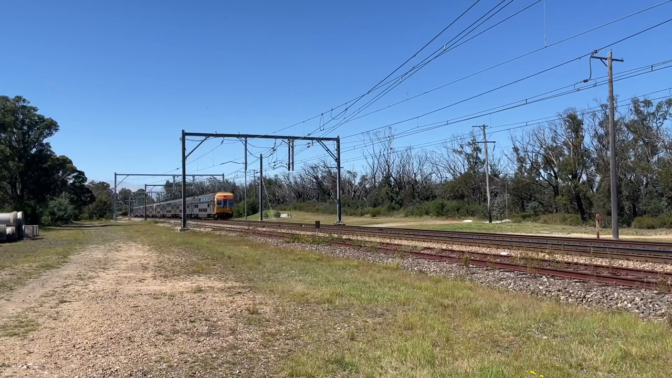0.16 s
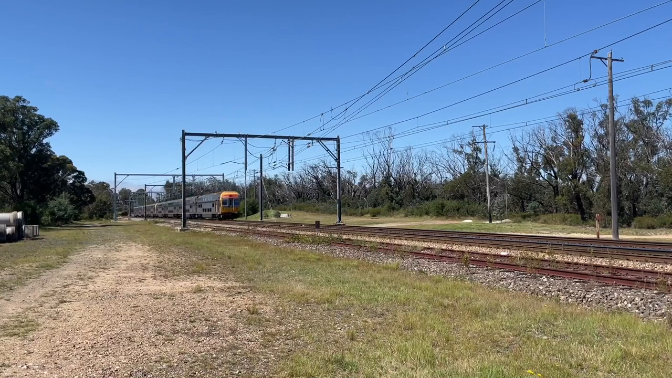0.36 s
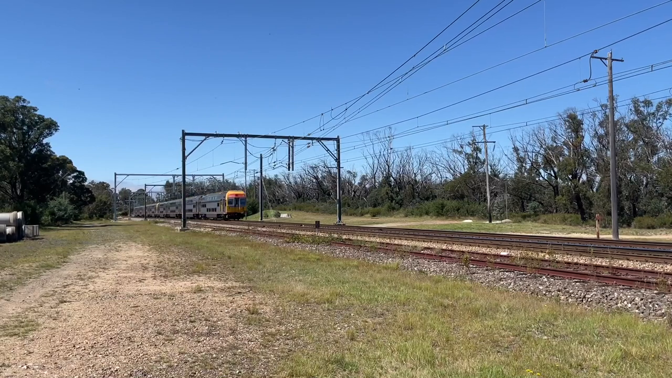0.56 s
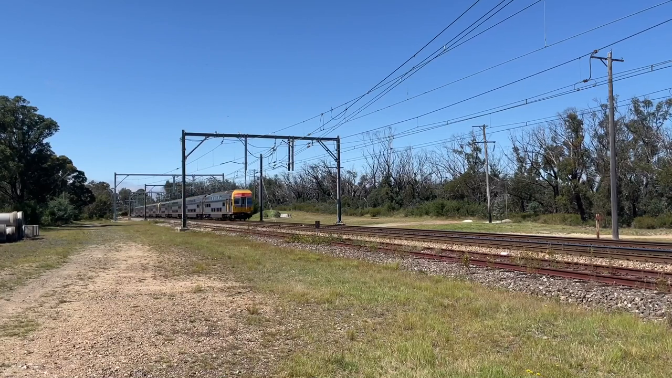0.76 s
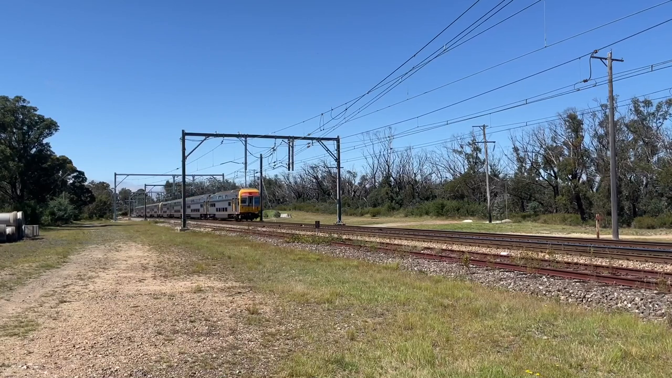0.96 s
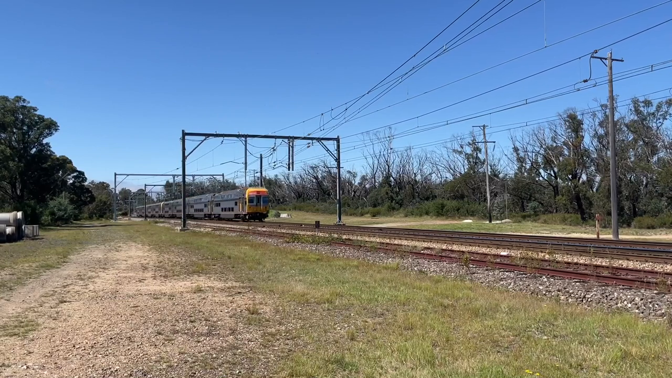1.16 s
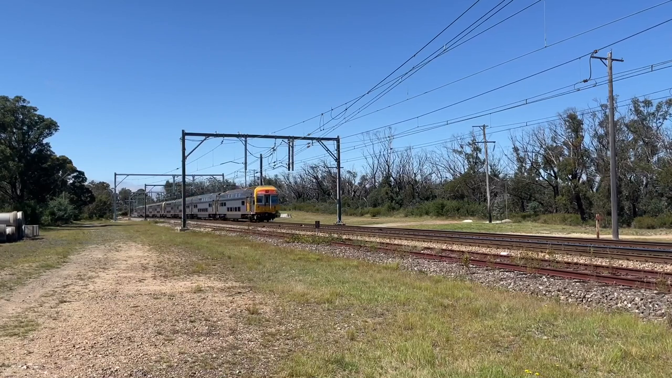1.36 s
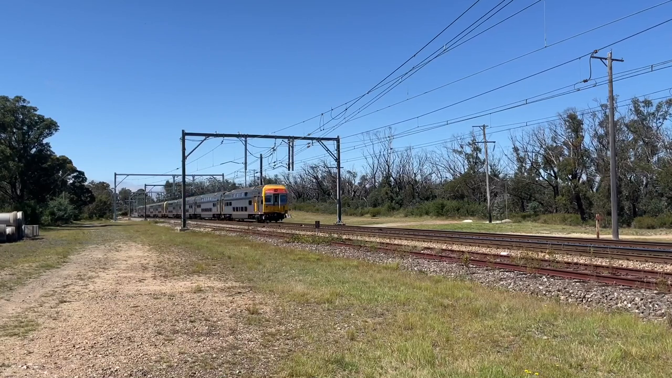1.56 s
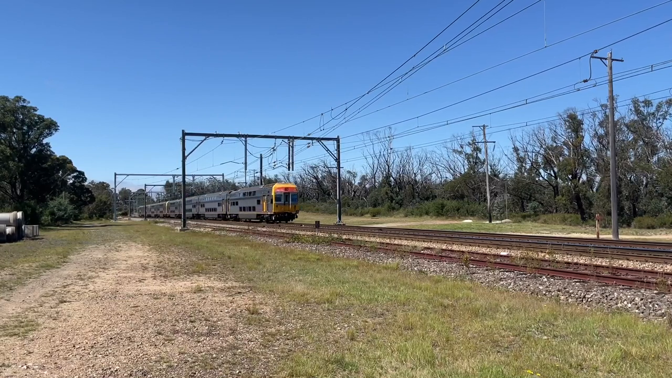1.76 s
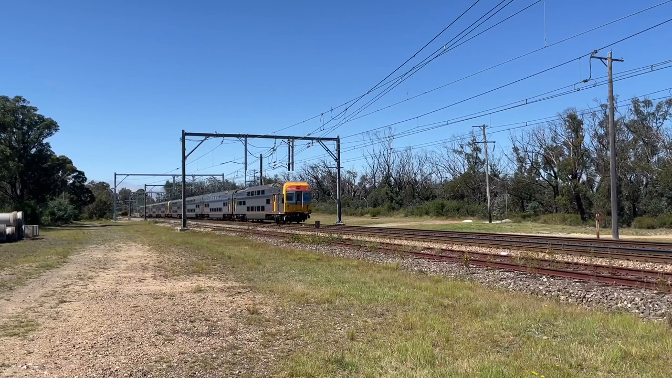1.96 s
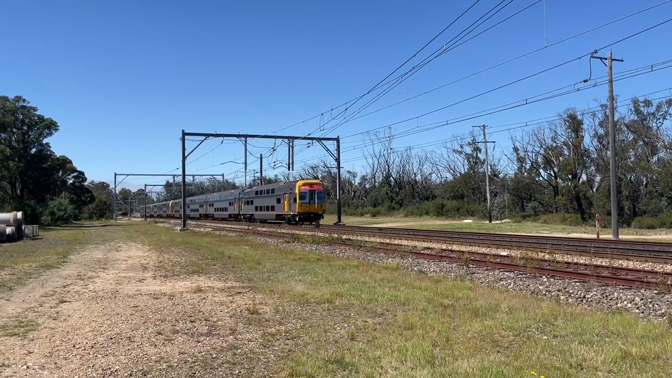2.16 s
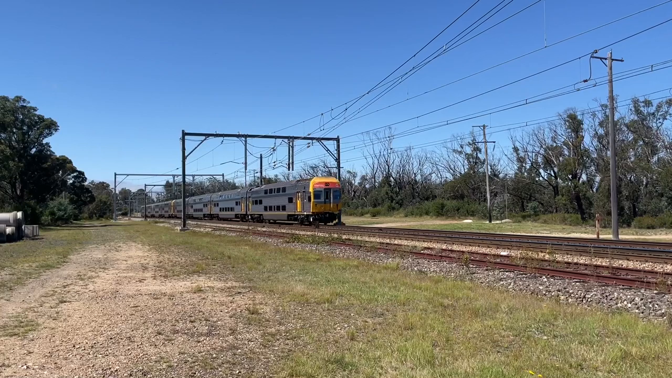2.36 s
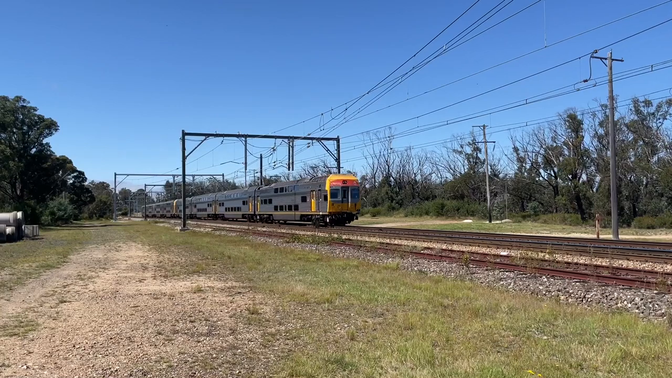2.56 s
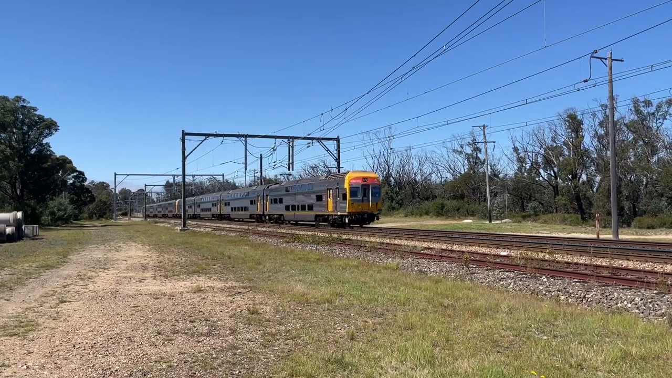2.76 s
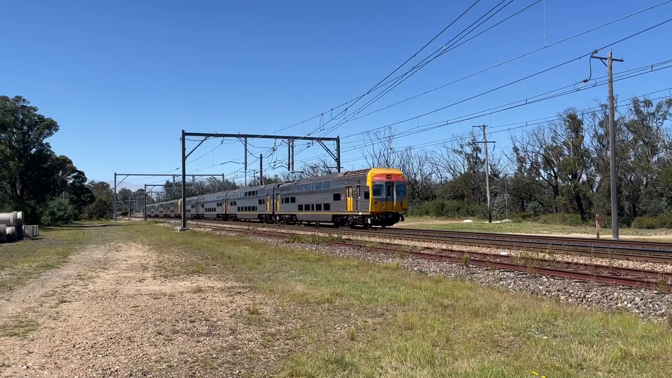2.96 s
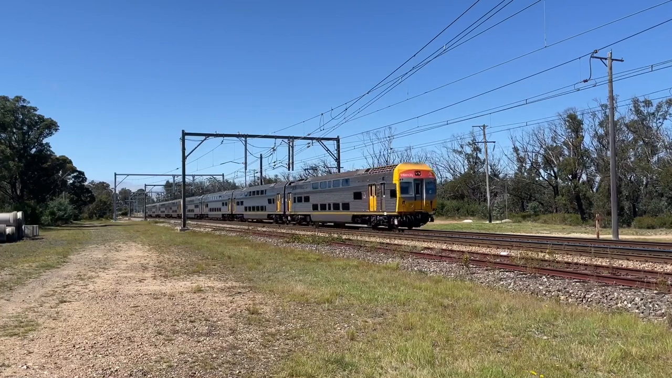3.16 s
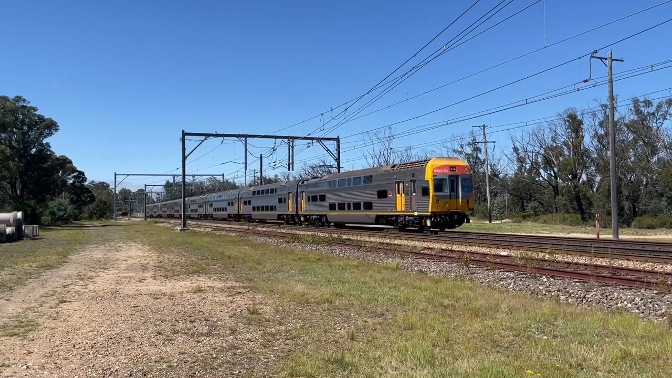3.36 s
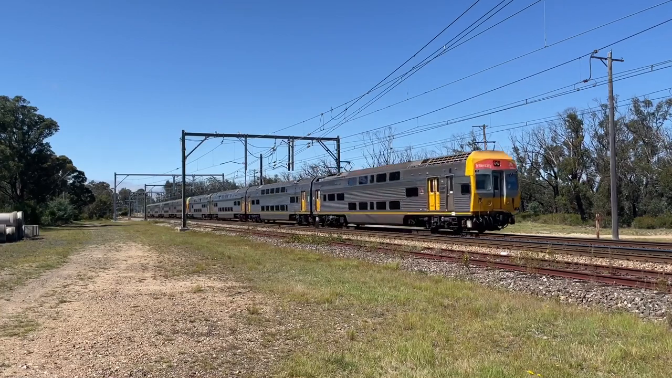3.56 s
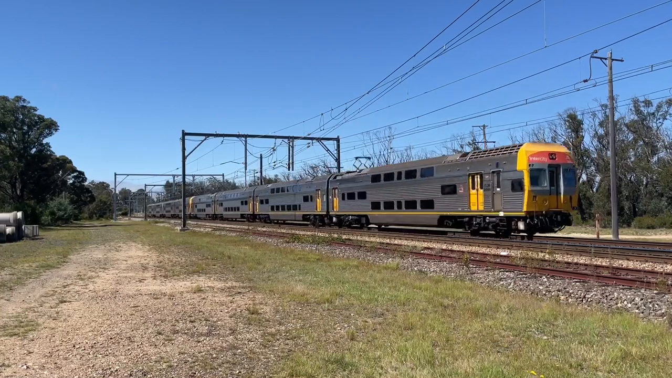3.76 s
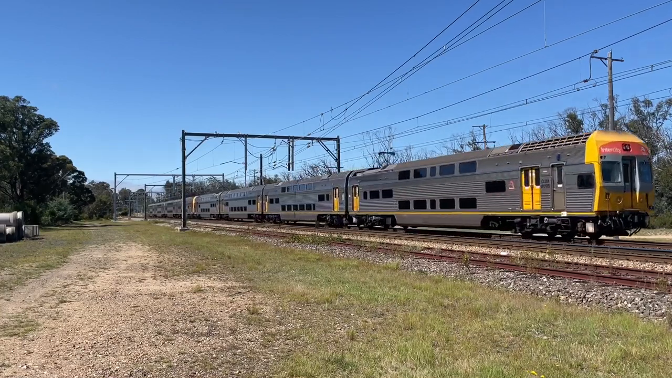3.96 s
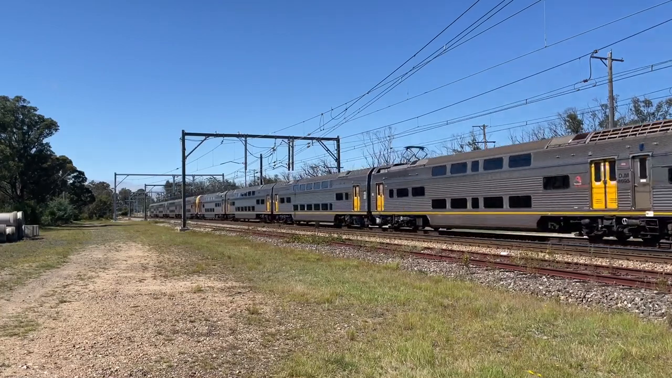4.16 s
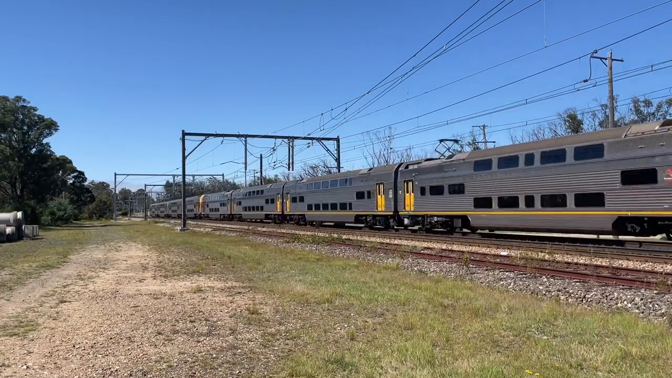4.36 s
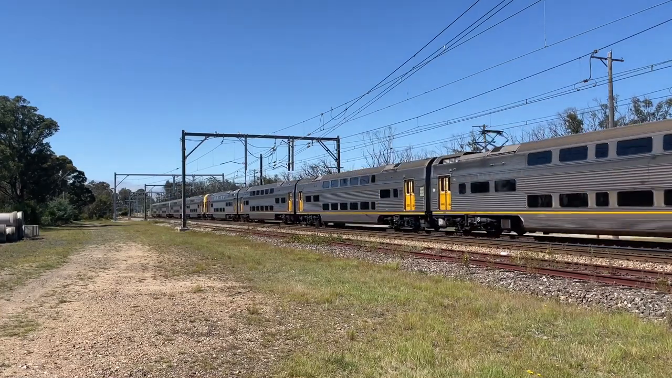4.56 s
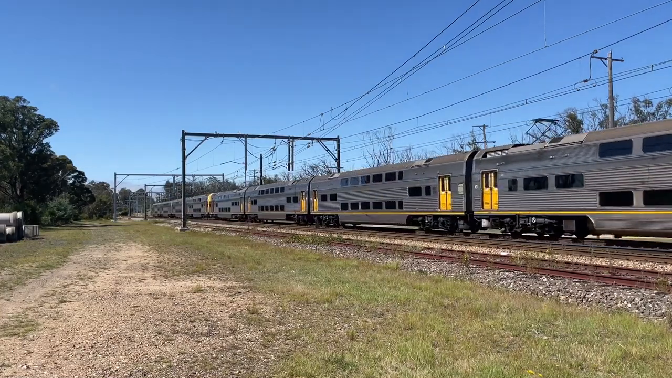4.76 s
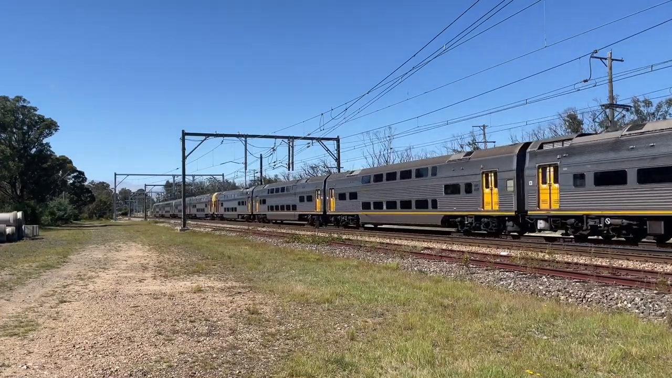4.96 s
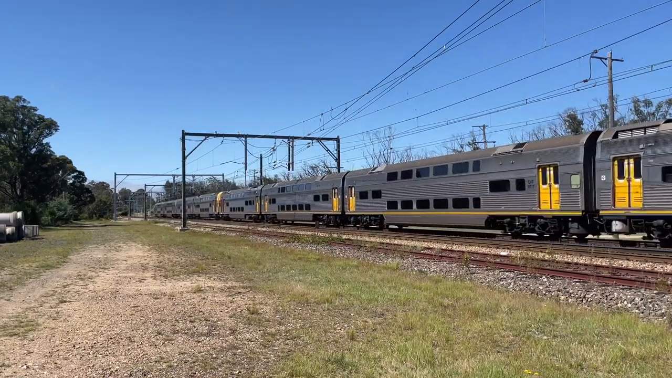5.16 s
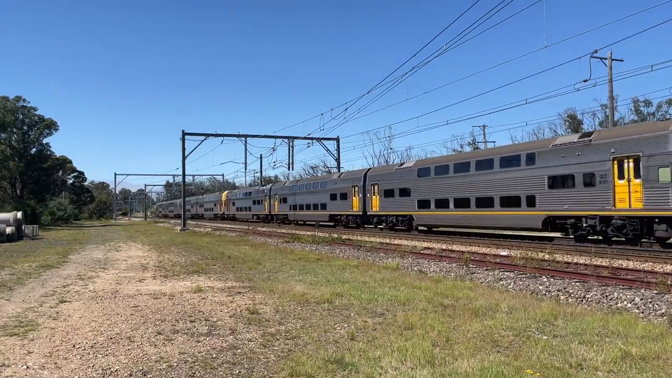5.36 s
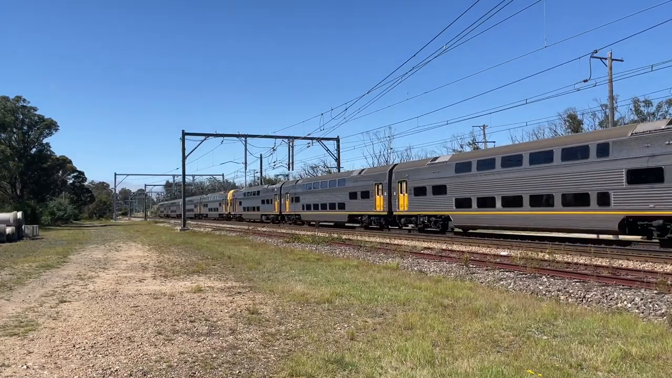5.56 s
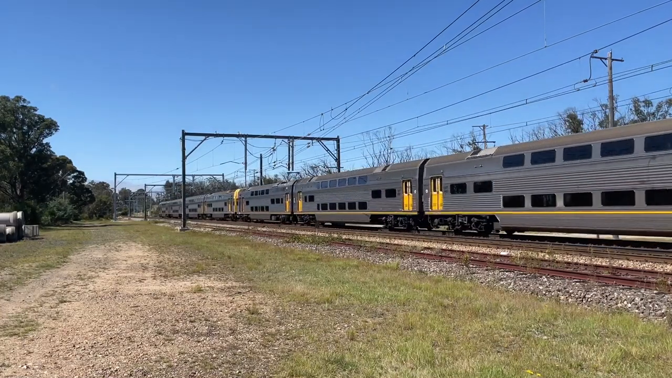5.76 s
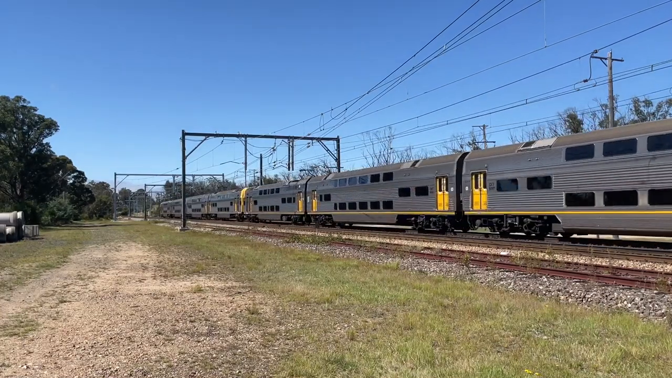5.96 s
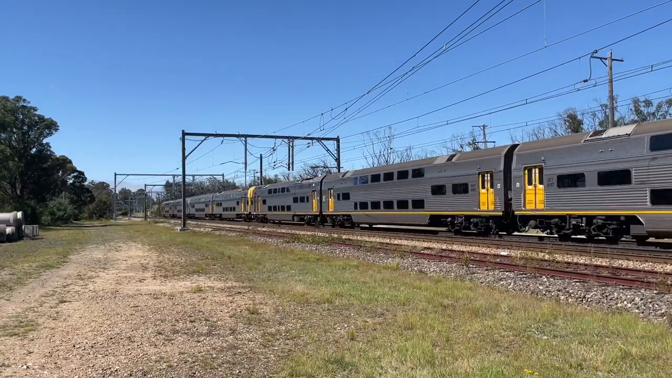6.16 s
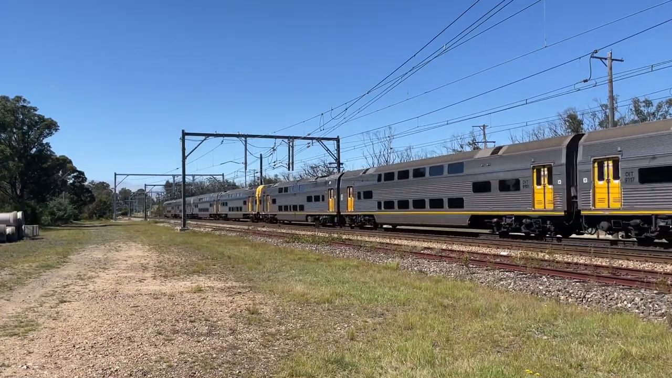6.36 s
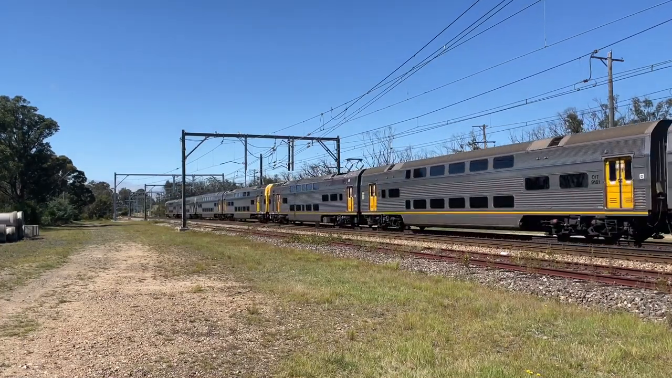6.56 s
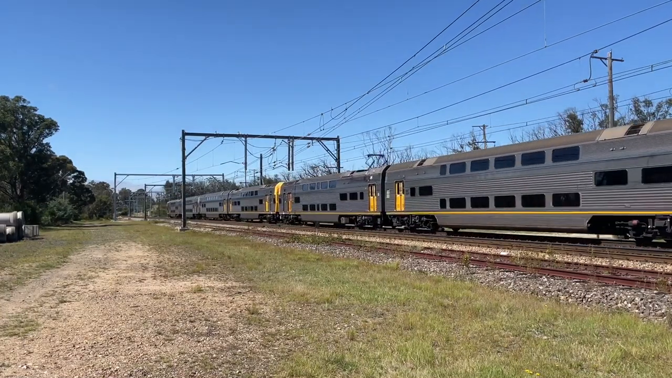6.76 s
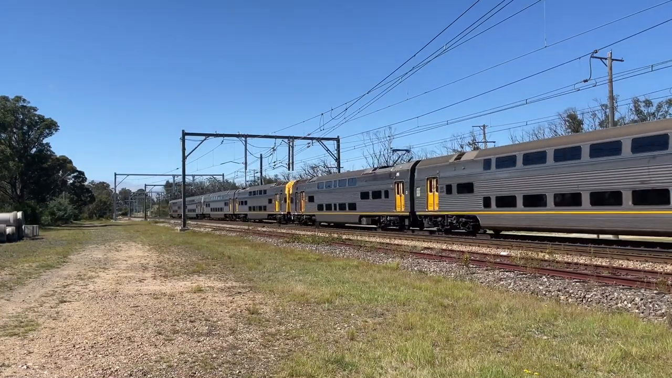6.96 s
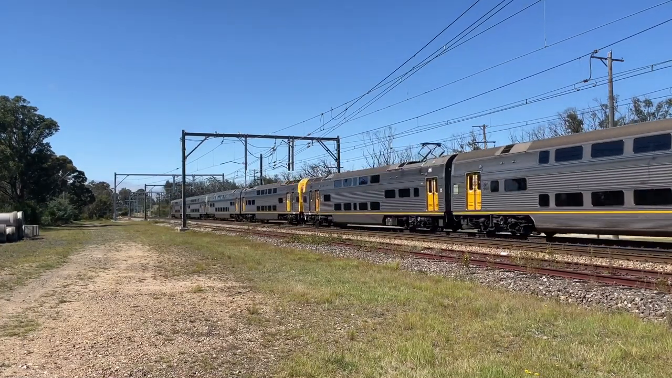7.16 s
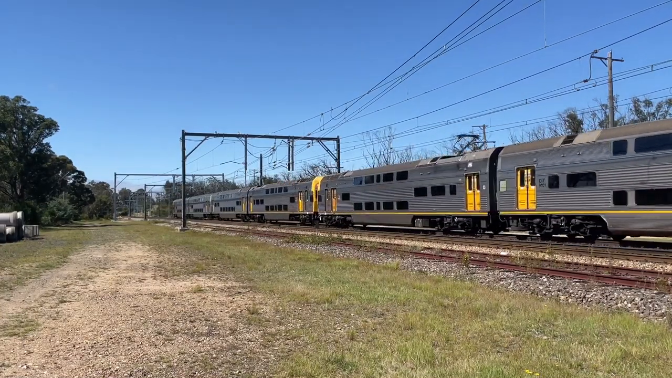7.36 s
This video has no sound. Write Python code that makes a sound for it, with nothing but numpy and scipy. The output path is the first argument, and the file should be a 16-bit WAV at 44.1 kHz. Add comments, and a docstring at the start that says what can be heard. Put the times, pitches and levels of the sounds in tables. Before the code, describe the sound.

An electric double-deck train swells from a faint distant roar to a close rumbling, ringing, whining pass, with early bird snaps and wind buffeting the microphone.

```python
"""Grass beside a country line: an electric double-deck train comes up and rolls past, 19 m from a phone.
Each group of wheels rings and hums, filtered noise read back with its own Doppler fall, over roaring rails.
Meshing gears whine as beating tones, slipping wheels sing, and worn wheels knock as bursts of noise.
Wind buffets the microphone with low noise and short tones; in the first two seconds and a bit,
a small bird snaps, whistles and trills from the bushes."""
import sys
import numpy as np
from scipy import signal
from scipy.fft import rfft, irfft, next_fast_len
from scipy.io import wavfile
from scipy.ndimage import uniform_filter1d, map_coordinates

SR = 44100
rng = np.random.default_rng(int(sys.argv[2]) if len(sys.argv) > 2 else 0)


def int16_out(signal):
    """Quantize to a 16-bit WAV file."""
    q = np.round(np.clip(np.atleast_2d(signal).T, -1, 1) * 32767)
    wavfile.write(sys.argv[1], SR, q.astype(np.int16))


N = 325899
T = np.arange(N) / SR
# room for a tail of half a second after the scene
LONG = next_fast_len(N + SR // 2, True)
HZ = np.maximum(np.arange(LONG // 2 + 1) * SR / LONG, 1)

SPEED_M_PER_S, TRACK_M, SOUND_M_PER_S = 17, 19, 343

# wheel groups: abreast t/s, relative ring level/dB, relative hum level/dB, pitch ratio
BOGIES = [(5.5, 0.5, -2.5, 1.0), (6.6, 2.5, -3, .994), (7.85, 3, 1, .985), (9.1, -1, 2.5, 1.003),
          (10.35, -4, -5, .99), (11.6, -14, 1, 1.008)]
# worn wheels knocking on the rail: t/s, level/dB, body f/Hz, decay/s
KNOCKS = [(2.247, -37, 1400, 0.009), (2.386, -39, 1050, 0.0091), (2.525, -44, 1050, 0.011),
          (2.659, -37, 1400, 0.017), (2.795, -32, 1350, 0.014), (2.801, -38.5, 2000, .012),
          (2.933, -33, 1350, 0.01), (3.073, -32, 1100, .008), (3.222, -39, 1300, .009),
          (5.727, -29, 1110, 0.02), (5.855, -32.5, 1100, .014), (6.012, -31, 1100, 0.015),
          (6.629, -31, 797, 0.0089), (6.887, -33, 1900, 0.042), (7.022, -27, 835, 0.022),
          (7.038, -31.5, 2200, .014), (7.163, -30, 749, 0.019), (7.355, -37, 1000, 0.013)]
# low turbulence, also the train's rumble: f/Hz, relative density/dB
WIND = [(20, -37), (32, -20), (45, -4), (62, -2), (88, -2.5), (120, -13.5), (200, -22.5), (700, -64)]
# boom of the bogies and of strong gusts: f/Hz, relative density/dB
BOOM = [(70, -19), (105, 1), (140, -0.5), (175, -5), (230, -19.5)]
# ring of rails and wheels: f/Hz, relative density/dB
RING = [(1400, -32), (1950, -1), (2450, 1), (3000, -2), (3330, -3.5), (3700, -3), (4150, -7), (4700, -14.5),
        (5600, -43), (8000, -45)]
# hiss of rails and wheels: f/Hz, relative density/dB
HISS = [(3200, -16), (5000, -0.5), (6800, -0.5), (8000, -5), (10500, -18.5), (14000, -40)]


def undb(db):
    """Decibels to gain."""
    return 10 ** (np.asarray(db) / 20)


def unit(x):
    """Scale to rms 1."""
    return x / np.sqrt(np.mean(x ** 2))


def curves(table):
    """Each column of a time table, sample by sample."""
    s, *columns = np.transpose(table)
    return [np.interp(T, s, column) for column in columns]


def over_hz(table):
    """Each column of a frequency table, bin by bin, straight over log frequency."""
    hz, *columns = np.transpose(table)
    return [np.interp(np.log(HZ), np.log(hz), column) for column in columns]


def noise(gain):
    """Two unrelated noises (direct and diffuse sound) of rms 1 with the given gain per bin."""
    bins = rng.standard_normal((2, 2 * len(HZ))).view(complex)
    return unit(irfft(gain * bins, LONG))


def coloured(spectrum):
    """A noise pair with the given spectrum, cut an octave beyond its ends."""
    inside = (HZ > spectrum[0][0] / 2) & (HZ < spectrum[-1][0] * 2)
    return noise(undb(over_hz(spectrum)[0]) * inside)[:, :N]


def resonances(modes):
    """Gain per bin of a set of steep-sided resonances."""
    return sum(undb(db) / (1 + ((HZ - hz) / width_hz) ** 2) for hz, width_hz, db in modes)


def walk(rate):
    """Random levels held 1 / rate s and slewed twice, of rms 1."""
    k = max(int(SR / rate), 1)
    steps = np.repeat(rng.standard_normal(N // k + 1), k)
    return unit(uniform_filter1d(uniform_filter1d(steps, k), k)[:N])


def ripple(width_hz):
    """Random peaks and dips over frequency; spread near 1."""
    knots = np.arange(1024) * width_hz
    return np.interp(HZ, knots, np.sqrt(2) * rng.standard_normal(len(knots)))


def mottle(pair, patchy_db, patch_s=.125, patch_hz=65, size=2048):
    """Narrow bands swell and fade on their own, as wheel modes are caught and let go."""
    hz, s, bins = signal.stft(pair, SR, nperseg=size)
    chance = rng.standard_normal((1024, 256))
    places = np.meshgrid(hz / patch_hz, s / patch_s, indexing="ij")
    field = map_coordinates(chance, places, order=1, mode="wrap")
    patchy = bins * undb(patchy_db * unit(field))
    return unit(signal.istft(patchy, SR, nperseg=size)[1][:, :N])


def burst(start_s, rise_s, decay_s):
    """Envelope with a quick rise and an exponential fall."""
    age = np.clip(T - start_s, 0, 20 * decay_s)
    return np.minimum(age / rise_s, 1) * np.exp(-np.maximum(age - rise_s, 0) / decay_s)


def arch(start_s, length_s):
    """Share of a short sound gone by, and its rounded envelope."""
    u = np.clip((T - start_s) / length_s, 0, 1)
    return u, np.sin(np.pi * u)


def glides(tones, wobble_hz, bend=1, wobbles_per_s=70):
    """Short tones that swell, slide in pitch and fade; a bend above 1 saves the slide for the end."""
    out, wobble = np.zeros(N), wobble_hz * walk(wobbles_per_s)
    for s, length_s, start_hz, end_hz, db in tones:
        on = (T >= s) & (T < s + length_s)
        u = (T[on] - s) / length_s
        hz = start_hz + (end_hz - start_hz) * u ** bend + np.roll(wobble, rng.integers(N))[on]
        out[on] += undb(db) * np.sin(np.pi * u) * np.sin(2 * np.pi * np.cumsum(hz) / SR)
    return out


def passage(abreast_s):
    """Distance of a wheel group, and the time what is now heard left it (delay counted from the start)."""
    r = np.hypot(SPEED_M_PER_S * (T - abreast_s), TRACK_M)
    return r, T - (r - r[0]) / SOUND_M_PER_S


def delayed(pair, sent):
    """Read a noise pair at the times it was sent out, which bends its pitch."""
    at = sent * SR
    whole = at.astype(int)
    return pair[:, whole] + (at - whole) * (pair[:, whole + 1] - pair[:, whole])


def approach(near_db, loss_db_per_m, far_db, arrives_s=5.15):
    """Gain that spreads and is absorbed from the nearest car, over a steady share from far up the line."""
    r = np.hypot(SPEED_M_PER_S * np.maximum(arrives_s - T, 0), TRACK_M)
    near = undb(near_db - loss_db_per_m * (r - TRACK_M)) * TRACK_M / r
    return np.hypot(near, undb(far_db))


def broadside(start_s=3.65, end_s=5.0):
    """0 while the train is far up the line, 1 once it fills the view."""
    return np.clip((T - start_s) / (end_s - start_s), 0, 1)


def ports(pair, table):
    """Both ports share the direct sound, with a lag and a level step; the diffuse sound sets them apart."""
    direct, diffuse = rfft(pair, LONG)
    likeness, lead, pan_db = over_hz(table)
    likeness, sides = np.clip(likeness, 0, 1), np.array([[1], [-1]])
    both = np.sqrt((1 + likeness) / 2) * direct + sides * np.sqrt((1 - likeness) / 2) * diffuse
    both[0] *= np.exp(1j * lead)
    return irfft(both * undb(sides * pan_db / 2), LONG)[:, :N]


def wheels(reach=2.3, ripple_hz=35, ripple_db=1.8, bed_db=-11, patchy_db=2.7):
    """Each wheel group rings with shared modes and many small ones of its own, falling in pitch as it goes by."""
    # wheel modes at rest: f/Hz, width/Hz, relative level/dB
    wheel_modes = [(1910, 92, -3), (2280, 58, -1), (2475, 82, -6), (2640, 41, -9.5), (3023, 80, -1),
                   (3580, 57, -6), (3740, 43, -4), (4190, 45, -11), (4446, 67, -2.5), (4990, 130, -15),
                   (5670, 170, -13)]
    modes = resonances(wheel_modes)
    modes = modes + undb(bed_db + over_hz(RING)[0]) + undb(bed_db - 8.5 + over_hz(HISS)[0])
    ring, power = 0, 0
    for abreast_s, ring_db, _, ratio in BOGIES:
        r, sent = passage(abreast_s)
        gain = undb(ring_db) / r ** reach
        own = noise(modes * undb(ripple_db * ripple(ripple_hz)))
        ring = ring + gain * delayed(own, sent * ratio)
        power = power + gain ** 2
    # even out the loudness: only the balance between groups is left
    return mottle(ring / np.sqrt(power), patchy_db)


def gears(reach=2.2):
    """Gearboxes and motors hum in their resonances, falling in pitch as each group goes by."""
    # gear and motor resonances at rest: f/Hz, width/Hz, relative level/dB
    gear_modes = [(190.2, 4.8, -0.5), (300.4, 8.4, -5.5), (370, 17.3, -3), (738.6, 18.5, -7),
                  (1122, 24, -8.5), (1316, 22, -13), (1520, 17, -12)]
    housing = noise(resonances(gear_modes))
    hum, power = 0, 0
    for abreast_s, _, hum_db, ratio in BOGIES:
        r, sent = passage(abreast_s)
        gain = undb(hum_db) / r ** reach
        own = np.roll(housing, rng.integers(LONG), axis=1)
        hum = hum + gain * delayed(own, sent * ratio)
        power = power + gain ** 2
    return unit(hum / np.sqrt(power))


def train(throb_db=.5, turn_s=.1373, far_ring_db=-7, hiss_slope=1.108, swell_db=2.0):
    """Rough wheels on rough rails: rumble, boom, drone, roar, ring, hiss; some throb with each wheel turn."""
    # low drone: f/Hz, relative density/dB
    drone_spectrum = [(140, -19), (195, 1.5), (235, -5.5), (310, -4.5), (400, -5), (480, -26), (800, -27.5)]
    # track roar: f/Hz, relative density/dB
    roar_spectrum = [(280, -26), (440, 0), (800, 1), (1150, -1), (1650, -6), (2100, -9), (3200, -29.5)]
    # ring of wheels and rails before each part's own trim: t/s, level/dB
    rolling = [(0, -57.5), (1.0, -57), (1.9, -54), (2.55, -49.5), (2.9, -45), (3.4, -42.5), (3.8, -40.5),
               (4.5, -37.5), (5.2, -36.0), (5.9, -34.5), (6.7, -35.5), (7.39, -35.5)]
    # roar of the track: t/s, level/dB
    roaring = [(0, -46), (0.8, -46), (1.5, -45.5), (2.3, -45.5), (3.0, -44), (3.5, -42), (4.1, -37.5),
               (5.0, -35), (6.3, -35.5), (7.39, -34.3)]
    # hum of gearboxes and motors: t/s, level/dB
    humming = [(0, -66.5), (2.1, -56), (2.85, -56), (3.55, -45.5), (4.1, -40.5), (4.75, -36.5), (6.1, -34),
               (6.7, -36.5), (7.39, -35.5)]
    ring_db = curves(rolling)[0]
    # in step with one of the knocks
    throb = throb_db * np.cos(2 * np.pi * (T - KNOCKS[5][0]) / turn_s)
    # the cars add sound from the side as they draw level
    side_db = 2.0 * broadside()
    # from far up the line the rails carry the sound; the wheels themselves come through later
    far = np.interp(T, [1.8, 4.4], [1, 0])

    rumble = coloured(WIND) * approach(near_db=-34.5, loss_db_per_m=0.0, far_db=-53)
    boom = coloured(BOOM) * approach(near_db=-32.5, loss_db_per_m=0.2, far_db=-48.5)
    boom = boom * undb(2.8 * walk(14))
    drone = coloured(drone_spectrum) * approach(near_db=-34.0, loss_db_per_m=0.13, far_db=-49.5)
    drone = drone * undb(side_db + 1.0 * walk(12))
    roar_db = curves(roaring)[0] + throb + 0.88 * walk(20)
    roar = mottle(coloured(roar_spectrum), patchy_db=2.0) * undb(roar_db)
    rails_db = ring_db - 5.5 + 5.5 * far + side_db / 2 + throb / 2 + 1.0 * walk(16)
    rails = mottle(coloured(RING), patchy_db=3.0) * undb(rails_db)
    # the hiss grows with the ring, a little faster
    hiss_db = hiss_slope * ring_db - 7.0 + 2.1 * walk(18)
    hiss = mottle(coloured(HISS), patchy_db=4.5) * undb(hiss_db)
    ring = wheels() * undb(ring_db - 0.04 + far_ring_db * far + throb / 2)
    hum = gears() * undb(curves(humming)[0] + swell_db * walk(14))
    return rumble + boom + drone + roar + rails + hiss + ring + hum


def far_hum(hz=67.7, end_s=0.79):
    """A clean, low hum from up the line, a few harmonics that soon fade."""
    # harmonics: multiple of the pitch, level/dB
    harmonics = [(1, -45.5), (2, -42), (3, -57)]
    tones = 0
    for k, db in harmonics:
        tones = tones + undb(db + 1.0 * walk(6.2)) * np.sin(2 * np.pi * (k * hz * T + rng.random()))
    return np.sqrt(2) * tones * np.clip((end_s - T) / 0.07, 0, 1)


def gust(start_s, hold_s, attack_s=0.019, release_s=0.29):
    """Envelope of a gust: attack, hold, release."""
    age = T - start_s
    return np.clip(age / attack_s, 0, 1) * np.exp(-np.maximum(age - hold_s, 0) / release_s)


def wind(breeze_db=-42, bright_db=-6.0, flutter_db=1.2):
    """Low turbulence that swells and brightens in gusts, with single eddies that thump the microphone."""
    # gusts: t/s, hold/s, level/dB
    gusts = [(0.577, 0.52, -40), (1.202, 0.7, -36.5), (1.95, 0.67, -29), (2.94, 0.17, -35.5),
             (5.57, 0.25, -28), (6.5, 0.33, -34.5), (6.934, 0.26, -27.5)]
    # single eddies: t/s, relative peak level/dB, f/Hz, length/s
    buffets = [(1.549, -34, 265, 0.043), (1.973, -16.5, 129, 0.031), (2.026, -12.5, 61, 0.036),
               (2.188, -16, 107, 0.028), (2.243, -16, 98, 0.023), (2.34, -29, 223, 0.016),
               (2.404, -10, 71.5, 0.021), (2.479, -22, 165, 0.038), (2.529, -19, 98, 0.033),
               (2.609, -16.5, 152, 0.02), (2.78, -20, 153, 0.024), (2.827, -16, 92.5, 0.033),
               (2.97, -14.5, 165, 0.013), (2.999, -19.5, 222, 0.015), (3.033, -23.5, 250, 0.022),
               (3.123, -21.5, 128, 0.04), (3.189, -22.5, 208, .03), (5.594, -10, 88.5, 0.019),
               (6.945, -12.5, 86.5, 0.042), (7.062, -18, 81, 0.027)]
    force = sum(undb(db) * gust(s, hold_s) for s, hold_s, db in gusts)
    low = coloured(WIND) * np.hypot(undb(breeze_db), force)
    bright = coloured(BOOM) * force * undb(bright_db)
    out = (low + bright) * undb(flutter_db * walk(15))
    for s, db, hz, length_s in buffets:
        u, swell = arch(s, length_s)
        out[0] += undb(db - 3.5) * swell * np.sin(2 * np.pi * (hz * length_s * u + rng.random()))
    return out


def whine(slip_hz=5, twin_db=-9, second_db=-18, third_db=-22):
    """Meshing teeth give a rough tone; a slower second axle adds overtones and, close to, a beating twin."""
    # gear whine: t/s, relative level/dB, meshing f/Hz
    meshing = [(0, -68, 378.6), (2.1, -62, 379), (2.5, -43.5, 377.7), (2.85, -52, 377),
               (3.55, -41.5, 379.8), (3.8, -49.5, 385), (3.98, -35, 386.7), (4.2, -33.5, 387),
               (4.55, -36, 386), (4.85, -33, 379), (5.0, -48, 380), (5.15, -34, 382), (5.32, -33, 383),
               (5.4, -45, 381), (5.48, -31, 382), (5.65, -39.5, 378), (5.76, -29.5, 372), (5.92, -33, 381),
               (6.08, -40, 381), (6.4, -31, 375.6), (6.65, -32, 373.6), (7.1, -33.5, 368),
               (7.39, -37.5, 360)]
    gain_db, jitter_turns, waver_db, rough_db = -1.1, .065, 1.4, 2.0
    db, hz = curves(meshing)
    tooth = 2 * np.pi * (np.cumsum(hz) / SR + jitter_turns * walk(22))
    twin = tooth - 2 * np.pi * (slip_hz * T + 0.13 * walk(4.5))
    mesh = np.sin(tooth) + undb(twin_db) * broadside() * np.sin(twin)
    mesh = mesh + undb(second_db) * np.sin(2 * twin) + undb(third_db) * np.sin(3 * twin)
    return unit(mesh) * undb(db + gain_db + waver_db * walk(18) + rough_db * walk(80))


def sizzle(gain_db=5.0, far_db_per_s=-8):
    """The finest roughness of the treads; the air swallows it until the train is close."""
    # sizzle of treads on rail: t/s, relative level/dB
    treads = [(2.4, -73), (3.1, -63), (3.5, -65.5), (4.1, -55.5), (4.75, -52), (5.5, -58), (5.9, -56.5),
              (6.4, -62), (7.0, -58), (7.39, -58)]
    # its colour: f/Hz, relative density/dB
    sizzle_spectrum = [(4200, -24), (5400, 1), (6700, 2), (8000, 2), (10000, -1), (11500, -3),
                       (13000, -10.5), (14000, -37)]
    # weaker the longer before the first table entry
    air_db = far_db_per_s * np.maximum(treads[0][0] - T, 0)
    return coloured(sizzle_spectrum) * undb(curves(treads)[0] + gain_db + air_db + 1.3 * walk(14))


def bushes(pair, t60_s=.3, tail_db=-9):
    """Leaves and trunks scatter a short, diffuse tail after each sound."""
    age = T[:SR // 2]
    tail = rng.standard_normal((2, len(age))) * np.exp(-np.log(1000) * age / t60_s)
    tail = tail * undb(tail_db) / np.sqrt(np.sum(tail[0] ** 2))
    return pair + signal.fftconvolve(pair, tail, axes=1)[:, :N]


def bird(snap_db=-3.0, rise_s=0.0015, trill_hz=8650, swing_hz=400, notes_per_s=27.0):
    """Noise bursts make rasps, a thin lead-in snap and a main snap; gliding tones whistle, swinging ones trill."""
    # phrases: main snap t/s, relative level/dB, relative lead-in snap level/dB
    phrases = [(0.0933, -0.5, -42), (.776, -1.5, -38), (1.402, 0, -40.5), (2.148, 0.5, -40)]
    # rasps and main snap of a phrase: t/s from the main snap, relative peak level/dB, decay/s
    phrase_snaps = [(-.14, -48, .012), (-.122, -46.5, 0.037), (-.002, -34.5, 0.004), (.0105, -48.5, 0.02)]
    # thin whistles of a phrase: t/s from the main snap, length/s, start f/Hz, end f/Hz, relative level/dB
    phrase_whistles = [(-.026, 0.028, 6350, 6220, -53), (.017, 0.04, 7350, 6800, -56),
                       (.012, .048, 4950, 4450, -54)]
    # trills: t/s, length/s, relative level/dB
    trills = [(0.267, .34, -66), (0.802, 0.27, -65), (1.43, 0.66, -70)]
    # rasps and main snap: f/Hz, relative density/dB
    snap_spectrum = [(2000, -12), (3200, 4), (3900, 1), (4500, 10), (5200, 6.5), (6500, 5), (8000, -2.5),
                     (11000, -16.5), (14000, -25)]
    # thinner lead-in snap: f/Hz, relative density/dB
    lead_in_spectrum = [(2000, -16), (3500, -3), (4600, 6), (5600, 4), (6700, 8), (8000, -5), (11000, -17),
                        (14000, -25)]
    lead_in_s, lead_in_decay_s = .049, 0.0034
    snaps, lead_ins, whistles = 0, 0, []
    for main_s, phrase_db, lead_in_db in phrases:
        for lag_s, db, decay_s in phrase_snaps:
            snaps = snaps + undb(phrase_db + db + snap_db) * burst(main_s + lag_s, rise_s, decay_s)
        early = burst(main_s - lead_in_s, rise_s, lead_in_decay_s)
        lead_ins = lead_ins + undb(lead_in_db + snap_db) * early
        for lag_s, *shape, db in phrase_whistles:
            whistles.append((main_s + lag_s, *shape, phrase_db + db))
    out = coloured(snap_spectrum) * snaps + coloured(lead_in_spectrum) * lead_ins
    # rasps and snaps flutter
    out = out * undb(2.2 * walk(260))
    # every note of the trill is loudest on its way down
    note = 2 * np.pi * (notes_per_s * T + 0.26 * walk(10))
    pitch = trill_hz + swing_hz * np.cos(note) + 220 * walk(1500)
    trill = np.sin(2 * np.pi * np.cumsum(pitch) / SR) * (1 + 0.4 * np.sin(note))
    out[0] += trill * sum(undb(db) * np.abs(arch(s, length_s)[1]) ** .5 for s, length_s, db in trills)
    out[0] += glides(whistles, wobble_hz=45, bend=1.8)
    return bushes(out)


def knocks(body_db=7, body_octaves=0.26, rise_s=0.0036):
    """A worn patch slaps the rail, mostly a wheel turn apart; each slap has its own strength and hollow pitch."""
    # clatter of a knock: f/Hz, relative density/dB
    clatter = [(300, -5), (600, -2), (1350, -1), (1800, -5.5), (2400, -4), (3600, -29), (8000, -40)]
    out = 0
    for s, db, hz, decay_s in KNOCKS:
        body = body_db * np.exp(-(np.log2(HZ / hz) / body_octaves) ** 2)
        gain = undb(over_hz(clatter)[0] + body) * (HZ < clatter[-1][0])
        out = out + noise(gain)[:, :N] * undb(db) * burst(s, rise_s, decay_s)
    return out


def squeals(gain_db=-.5, sag_per_s=0.0103):
    """A slipping wheel sings out roughly in one mode, sagging in pitch; the short, hard slips are the roughest."""
    # single wheels singing out: t/s, length/s, mid f/Hz, relative level/dB
    slips = [(2.699, 0.46, 4750, -56), (3.5, 0.52, 3850, -48.5), (3.82, 0.44, 4700, -46),
             (3.9, .55, 2000, -45), (4.17, .3, 3880, -47), (4.696, 0.11, 3700, -36),
             (4.682, .14, 3095, -41), (4.85, .13, 3740, -34), (4.845, .075, 3120, -37),
             (4.867, 0.13, 3490, -38), (4.89, 0.1, 3030, -39), (4.918, 0.605, 4630, -46),
             (5.28, 0.13, 2980, -37), (5.422, 0.75, 3083, -39), (6.15, .7, 4550, -43),
             (6.417, 0.42, 5060, -47), (7.14, .16, 4400, -41)]
    short_s, short_wobble_hz, long_wobble_hz, slips_per_s, rough_db = .2, 42, 24, 160, 2.8
    out = 0
    for s, length_s, hz, db in slips:
        # half the share of pitch lost from start to end
        sag = sag_per_s * length_s / 2
        tone = (s, length_s, hz * (1 + sag), hz * (1 - sag), db + gain_db)
        wobble_hz = short_wobble_hz if length_s < short_s else long_wobble_hz
        out = out + glides([tone], wobble_hz, wobbles_per_s=slips_per_s)
    return out * undb(rough_db * walk(slips_per_s))


def near_motor(start_s=6.55, length_s=1.1, start_hz=356, end_hz=245, db=-32, wobble_hz=7, rough_db=2.0):
    """One motor growls by close at hand, a rough tone falling in pitch."""
    growl = glides([(start_s, length_s, start_hz, end_hz, db)], wobble_hz, bend=1.6)
    return growl * undb(rough_db * walk(22))


def scene():
    """The train comes from far off to ahead to beside; the bird stays in the distant bushes."""
    # the two microphone ports, for sound far off, ahead and beside:
    # f/Hz, likeness 0-1, left lead/rad, left minus right level/dB
    far_ports = [(130, 0.92, 0, -1), (400, 0.68, 0.24, -1.5), (590, 0.14, -1, -1), (900, 0, -1.5, -3.5),
                 (1500, 0.45, -2.0, -1), (2310, 0.77, -0.1, 0.5), (3380, 0.07, 1, 0), (5000, 0.8, 0.5, 1),
                 (6160, 1, -2.0, 0), (7300, 1, -2.5, -2.5), (8560, 0.85, -4, 1), (10300, 0.9, -5, -1)]
    ahead_ports = [(130, 0.94, 0.5, 0.5), (400, 0.81, 0, -0.5), (890, 0.3, -0.7, -1), (1500, 1, -1, -0.5),
                   (2050, 1, -1, 0.5), (5000, 0.83, 0.5, 0.5), (5900, 0, -1.8, 0.5), (7160, 1, -3.0, 1),
                   (7940, 1, -2.5, 0), (8800, 0.5, -5, 0), (10100, 0.67, -6, 0)]
    beside_ports = [(100, 0.91, -0.07, -1), (360, 0.84, -1, -2.5), (690, 0.76, -1.7, -4.5),
                    (1640, 0.55, -2, -1.5), (2140, 0.37, 1.14, 2), (3070, 0.71, 0, 0.5),
                    (4600, 0.58, 0.36, 1), (6140, 0.2, -1.5, 0.5), (7070, 1, -3.0, 1.5), (8270, 1, -3, 0.5),
                    (8680, 0.39, -3.5, 3), (9400, .97, -5.5, 0)]
    pair = train() + sizzle() + knocks() + wind()
    pair[0] += far_hum() + squeals() + whine() + near_motor()
    far, near = np.interp(T, [1.6, 2.8], [1, 0]), broadside()
    passing = far * ports(pair, far_ports)
    passing = passing + (1 - far - near) * ports(pair, ahead_ports)
    passing = passing + near * ports(pair, beside_ports)
    return passing + ports(bird(), far_ports)


def record(dry, top_hz=13200):
    """A steep low-pass leaves the top dull."""
    return signal.sosfilt(signal.ellip(8, .2, 70, top_hz, fs=SR, output="sos"), dry)


dry = scene()
out = record(dry)
int16_out(out)
```